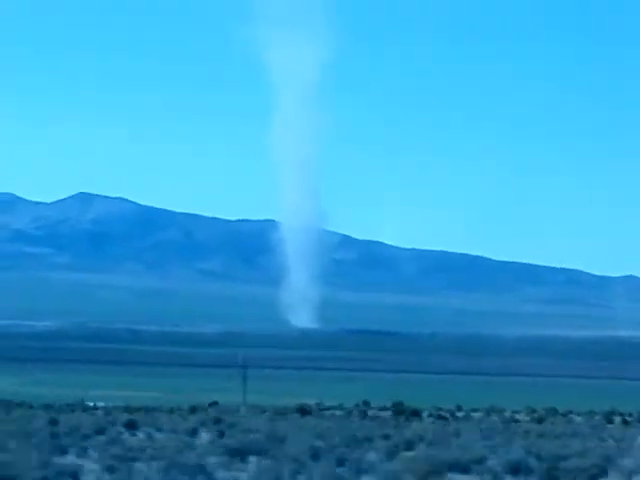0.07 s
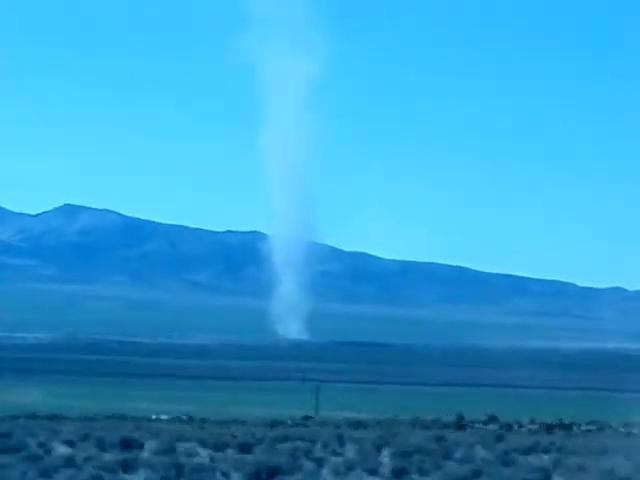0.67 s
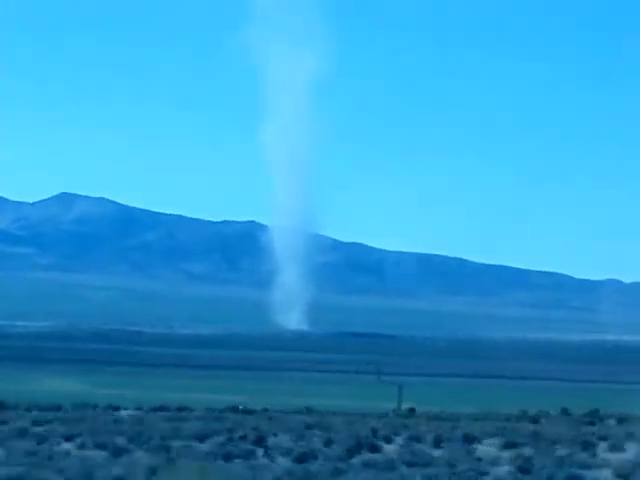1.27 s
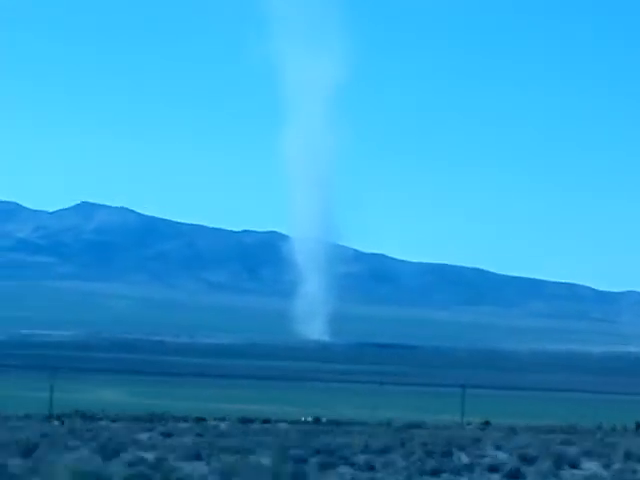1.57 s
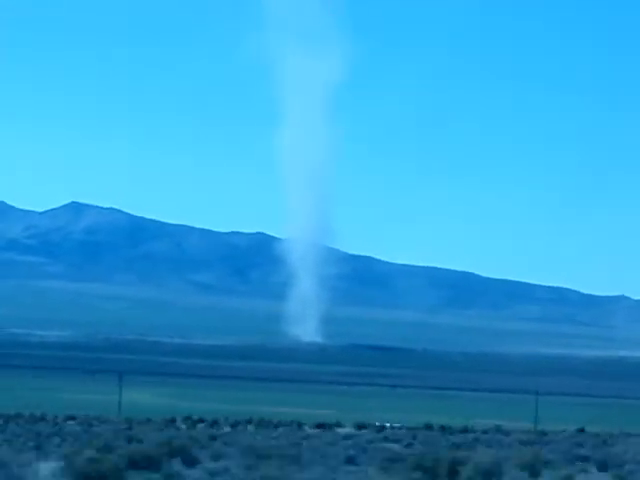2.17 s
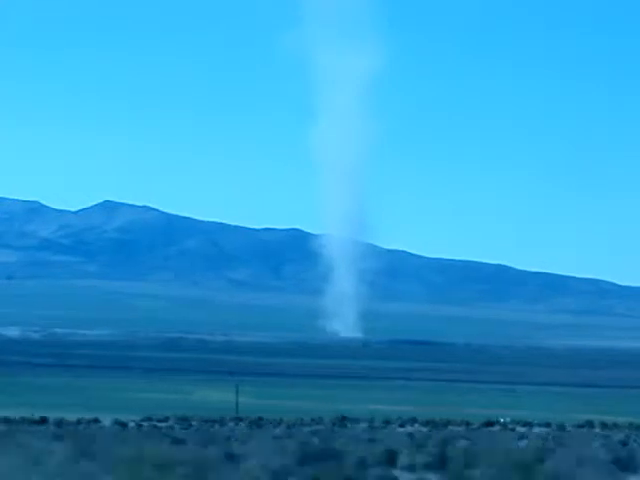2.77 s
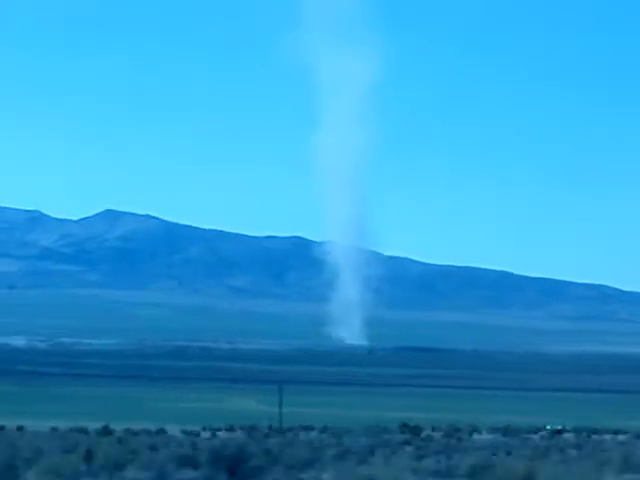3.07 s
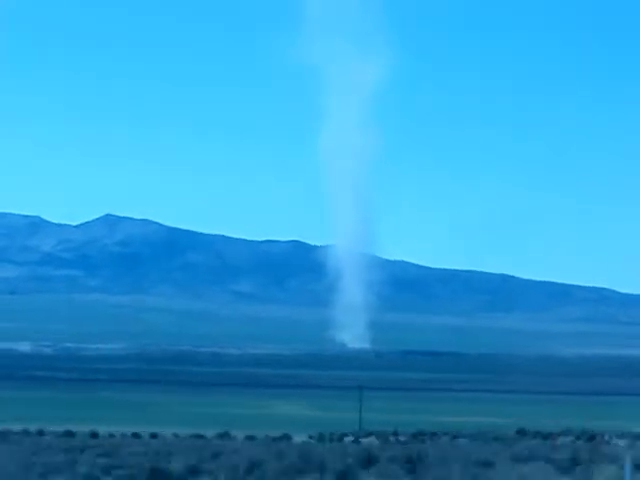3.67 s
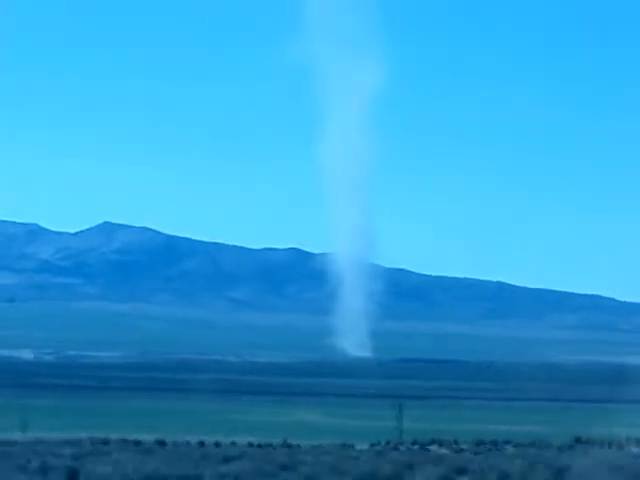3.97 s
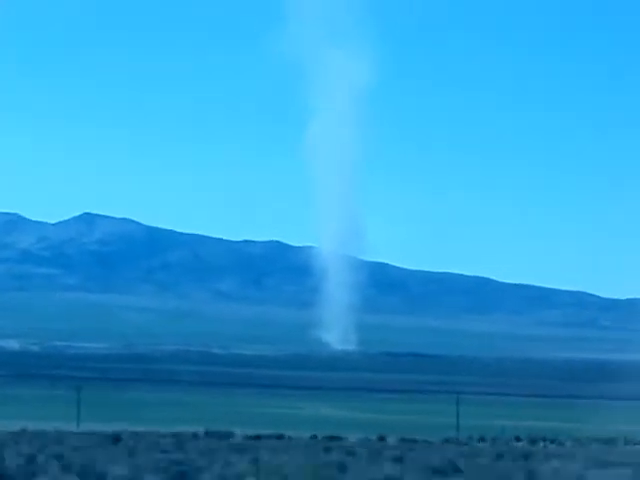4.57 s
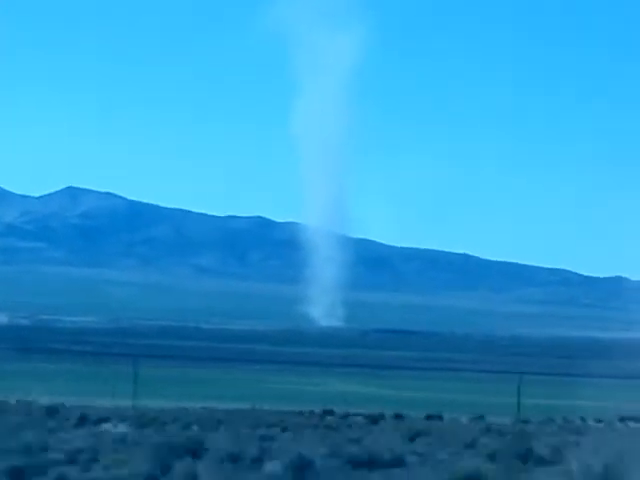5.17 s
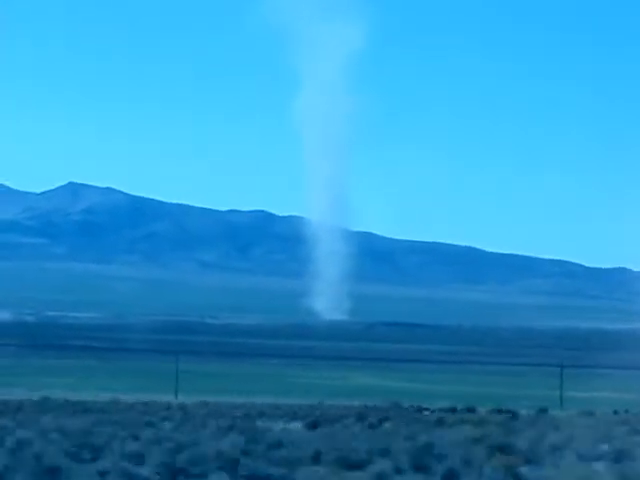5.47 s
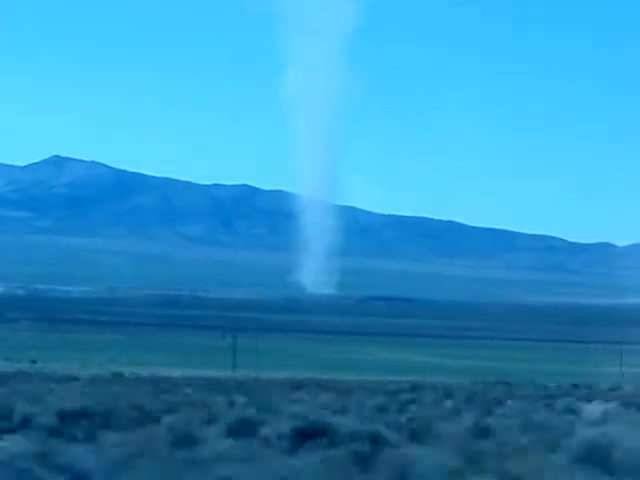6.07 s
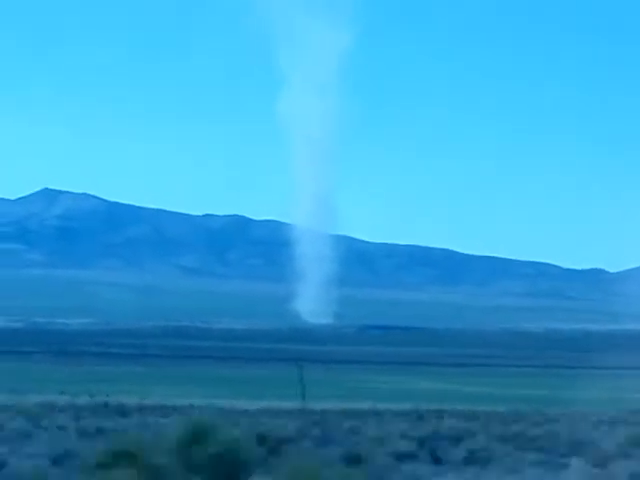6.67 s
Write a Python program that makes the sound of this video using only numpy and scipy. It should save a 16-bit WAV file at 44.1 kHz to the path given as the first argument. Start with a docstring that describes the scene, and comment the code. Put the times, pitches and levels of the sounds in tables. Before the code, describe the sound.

A steady booming drivetrain drone over tyre roar and faint rushing air, heard inside a vehicle cruising on a highway.

```python
"""A booming drivetrain drone over tyre roar, heard from inside a vehicle cruising on an open highway.
The shaft's fifth order booms in the cabin; uneven tyres throb once a turn and other turning parts hum.
Asphalt roars up through the body, air rushes along the windows, and loose trim ticks faintly twice.
One microphone in the cabin takes it all in, overloading so that the highest positive peaks flatten."""
import sys
import numpy as np
from scipy.fft import rfft, irfft, next_fast_len
from scipy.io import wavfile
from scipy.ndimage import map_coordinates

SR = 44100
rng = np.random.default_rng(int(sys.argv[2]) if len(sys.argv) > 2 else 0)


def unload_wav(signal):
    """Save mono or channel-first audio to the path in sys.argv[1] as 16-bit WAV at rate SR, clipped to [-1, 1]."""
    wavfile.write(
        sys.argv[1],
        SR,
        np.round(np.clip(np.atleast_2d(signal).T, -1, 1) * 32767).astype(np.int16),
    )


N = 300762

# Brief swells of the cabin boom. Each row: time of the peak in seconds, rise in dB.
BOOM_SWELLS = [(1.08, 1.5), (1.8, 2.5), (2.57, 1.8), (5.55, 1)]
# The weaker drivetrain tones around the boom. Each row: multiple of the shaft rate, level in dB.
SHAFT_ORDERS = [(3, -50), (4, -34.5), (6, -43), (7, -32), (8, -44.5), (9, -37.5), (10, -38), (13, -46),
                (16, -51), (17, -51.5), (19, -51), (23, -43.5)]
# Tones of the uneven tyres. Each row: multiple of the wheel rate, level in dB.
TYRE_ORDERS = [(3, -41.5), (9, -43), (10, -45), (11, -33.5), (12, -36), (13, -38.5), (15, -31.5), (18, -37)]
# Steady hums of other turning parts. Each row: pitch in Hz, level in dB.
PART_HUMS = [(28.8, -48.5), (71.8, -42.5), (86.2, -45), (257.3, -48), (279.5, -41), (321.7, -42),
             (406.9, -36.5), (450.3, -40.5)]
# Slow drift shared by road and air noise. Each row: time in seconds, dB about the usual level.
ROLLING_DRIFT = [(0, 0.1), (1.5, .5), (4.8, -.6), (5.95, 0.53), (6.82, -0.4)]
# Road roar as it reaches the cabin. Each row: frequency in Hz, relative spectral level in dB.
ROAR_SPECTRUM = [(15, -23), (35, -14.5), (55, -12.5), (100, -7), (150, -1.5), (200, 0), (240, 1.5),
                 (275, -4), (350, -4), (440, -5), (520, -7.5), (600, -6.5), (760, -8.5), (1150, -14.3),
                 (2000, -25), (4000, -61.5)]
# Narrow bands where the tread sings. Each row: centre in Hz, half-width in Hz, relative level in dB.
TREAD_BANDS = [(412.5, 33, -33), (590, 12, -39.5), (871, 10, -46.5), (1019, 22, -37), (1634, 24, -41.5),
               (1826, 35, -47), (2046, 13, -53), (2105, 21, -49), (2248, 16, -52), (4680, 70, -64)]
# Air on the windows, heard from inside. Each row: frequency in Hz, relative spectral level in dB.
RUSH_SPECTRUM = [(300, -20), (1300, 5), (1800, 11), (1950, 3.5), (2400, 4.5), (3000, -1), (3900, -2),
                 (4450, -7.5), (4750, -8.5), (5100, -9.5), (5500, -8.5), (6400, -18), (7100, -16),
                 (10000, -26)]
# Faint ticks of loose trim. Each row: start in seconds, level in dB, pitch in Hz.
TRIM_TICKS = [(4.2572, -31.5, 8630), (6.26, -33, 6120)]


def amp(db):
    """Decibels to gain."""
    return 10 ** (np.asarray(db) / 20)


def wobble(rate):
    """A smooth random curve, rate knots a second."""
    knots = rng.standard_normal(int(N * rate / SR) + 4)
    return map_coordinates(knots, [np.arange(N) * rate / SR])


def filtered(x, response):
    """x through a filter whose gain is response(Hz)."""
    size = next_fast_len(N + SR // 2)
    gain = response(np.fft.rfftfreq(size, 1 / SR))
    return irfft(rfft(x, size) * gain, size)[:N]


def noise(response):
    """Noise of rms 1 with the given response."""
    x = filtered(rng.standard_normal(N), response)
    return x / np.sqrt(np.mean(x ** 2) + 1e-20)


def colour(points):
    """The response through (Hz, dB) points on a log axis."""
    point_hz, db = np.transpose(points)
    return lambda hz: amp(np.interp(np.log(hz + 1), np.log(point_hz), db))


def band(centre_hz, half_width_hz):
    """The response of one resonant peak."""
    return lambda hz: 1 / (1 + ((hz - centre_hz) / half_width_hz) ** 2)


def tone(cycles, flutter_db):
    """A sine of rms near 1 that follows a running count of cycles and flutters in strength."""
    return np.sqrt(2) * np.sin(2 * np.pi * (cycles + rng.random())) * amp(flutter_db * wobble(5))


def drivetrain(t, boom_order=5, boom_hz=211.5, creep_hz_per_s=0.1102, boom_db=-19, ease_db_per_s=0.06):
    """Tones locked to one shaft; the cabin booms at one, its pitch creeping up as speed gathers."""
    shaft_turns = np.cumsum(boom_hz + creep_hz_per_s * t) / SR / boom_order
    swell_db = sum(db * np.exp(-((t - peak) / 0.11) ** 2) for peak, db in BOOM_SWELLS)  # about 0.2 s each
    boom = amp(boom_db - ease_db_per_s * t + swell_db) * tone(boom_order * shaft_turns, flutter_db=0.6)
    return boom + sum(amp(db) * tone(order * shaft_turns, flutter_db=1.0) for order, db in SHAFT_ORDERS)


def tyre_throb(wheel_hz=12.43):
    """Tyre unevenness repeats each turn, so its low tones beat into a throb."""
    wheel_turns = np.cumsum(wheel_hz * (1 + 0.00064 * wobble(0.98))) / SR
    return sum(amp(db) * tone(order * wheel_turns, flutter_db=0.5) for order, db in TYRE_ORDERS)


def turning_parts(t):
    """Other turning parts hum at their own, slightly wandering, rates."""
    return sum(amp(db) * tone(hz * t + 0.08 * wobble(1.97), flutter_db=1.0) for hz, db in PART_HUMS)


def road_roar(drift_db, level_db=-18.4):
    """Asphalt grain shakes the body into a broad roar around the microphone."""
    return amp(level_db + drift_db + 0.41 * wobble(6.4)) * noise(colour(ROAR_SPECTRUM))


def tread_song(lift_db=1.3):
    """The same grain makes the tread sing in narrow bands, each wavering on its own."""
    return sum(amp(db + lift_db + 0.92 * wobble(4)) * noise(band(hz, half_width))
               for hz, half_width, db in TREAD_BANDS)


def window_rush(drift_db, level_db=-33):
    """Turbulent air hisses along the outside of the windows."""
    gust_db = 0.31 * (wobble(6) + wobble(25))
    return amp(level_db + drift_db + gust_db) * noise(colour(RUSH_SPECTRUM))


def loose_trim(t, decay_s=0.0079):
    """Each tick is a tiny burst around one pitch, dying by 60 dB in decay_s."""
    ticks = np.zeros(N)
    for start, db, hz in TRIM_TICKS:
        envelope = (t >= start) * amp(db - 60 * np.abs(t - start) / decay_s)
        ticks += envelope * noise(band(hz, 0.15 * hz))
    return ticks


def scene():
    """Everything meets at one spot in the cabin; road roar and air rush rise and fall together."""
    t = np.arange(N) / SR
    drift_db = np.interp(t, *np.transpose(ROLLING_DRIFT))
    tyres = road_roar(drift_db) + tread_song() + tyre_throb()
    rush = window_rush(drift_db)
    return (drivetrain(t) + turning_parts(t) + tyres + rush + loose_trim(t))[None]


def record(dry, ceiling=0.47, hardness=24, top_hz=10000):
    """The microphone saturates on the positive side only; the recorder keeps nothing above top_hz."""
    overload = np.maximum(dry[0], 0) / ceiling
    flattened = dry[0] / (1 + overload ** hardness) ** (1 / hardness)
    return filtered(flattened, lambda hz: hz < top_hz)[None]


dry = scene()
out = record(dry)
unload_wav(out)
```